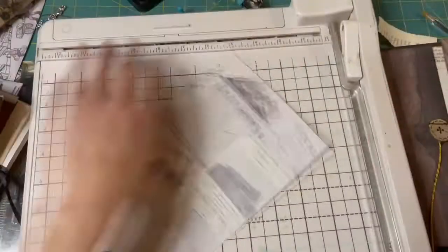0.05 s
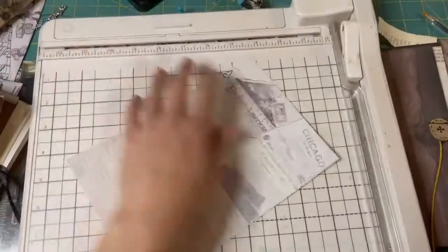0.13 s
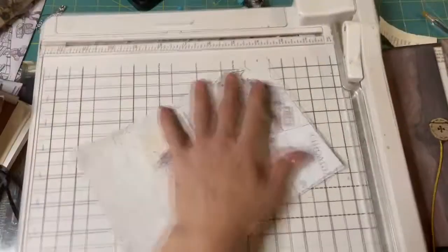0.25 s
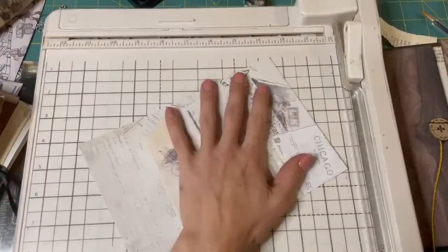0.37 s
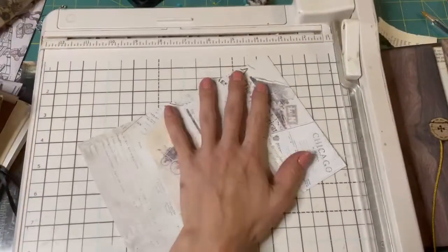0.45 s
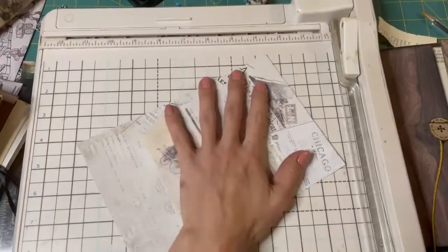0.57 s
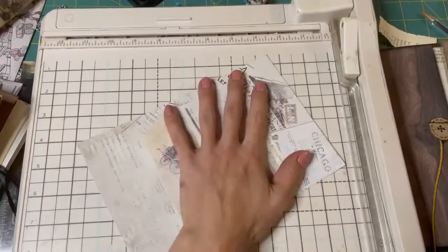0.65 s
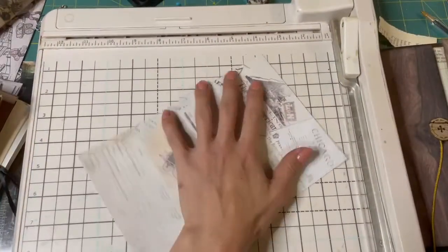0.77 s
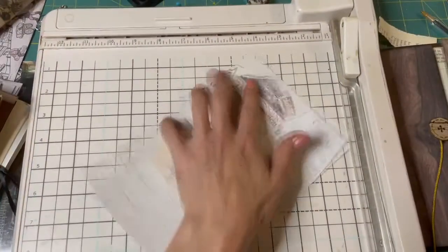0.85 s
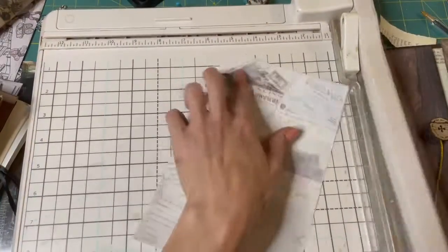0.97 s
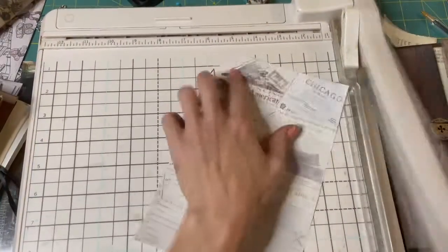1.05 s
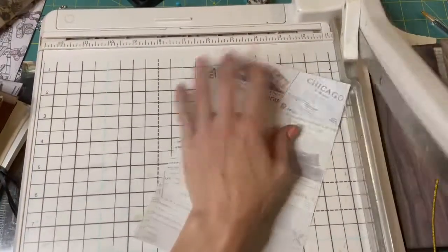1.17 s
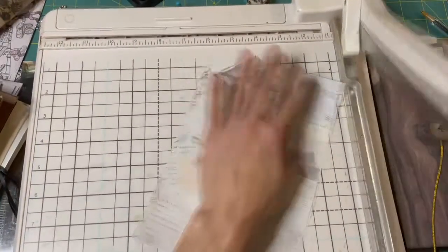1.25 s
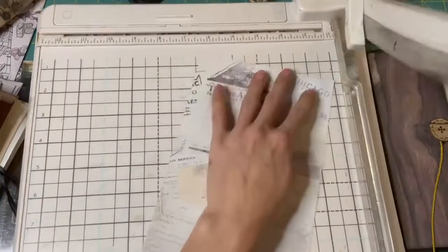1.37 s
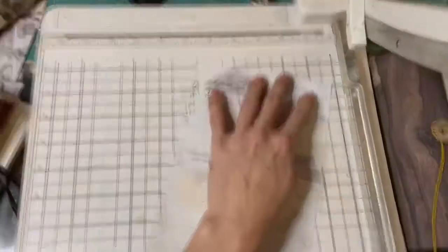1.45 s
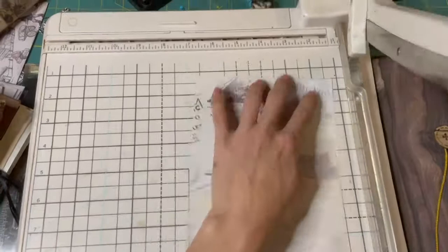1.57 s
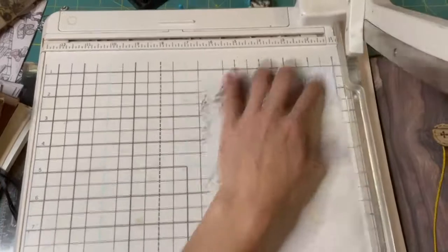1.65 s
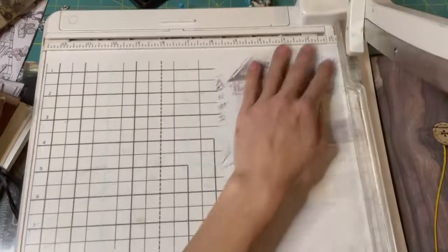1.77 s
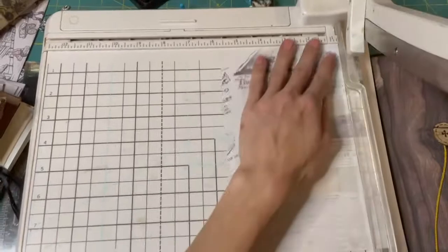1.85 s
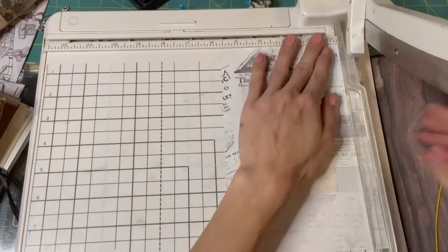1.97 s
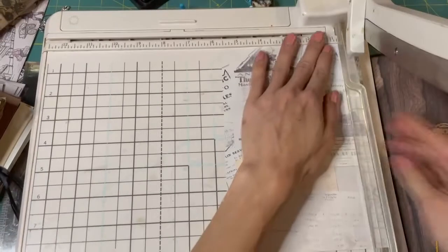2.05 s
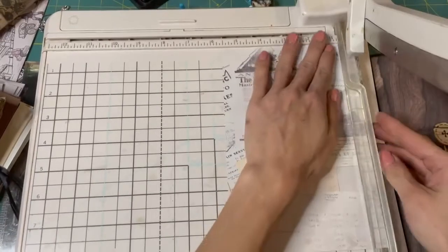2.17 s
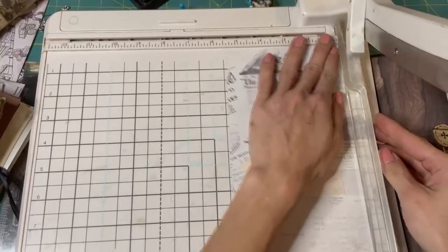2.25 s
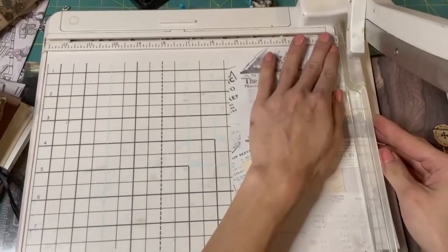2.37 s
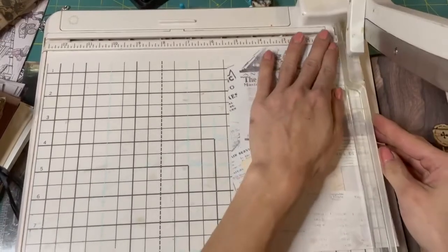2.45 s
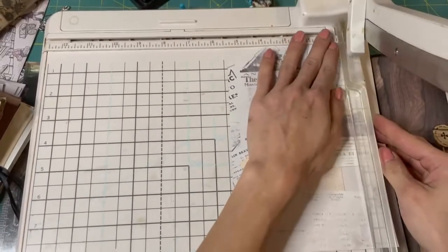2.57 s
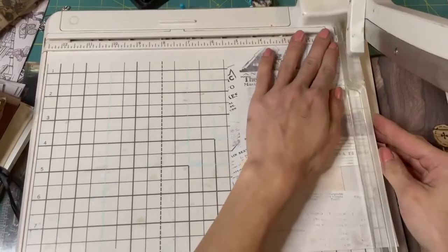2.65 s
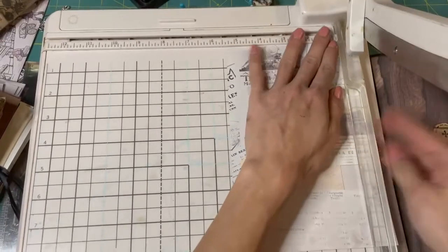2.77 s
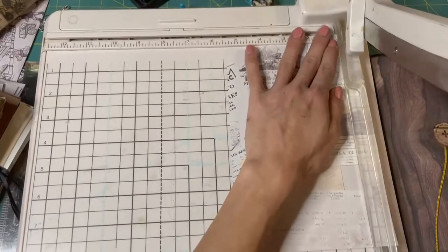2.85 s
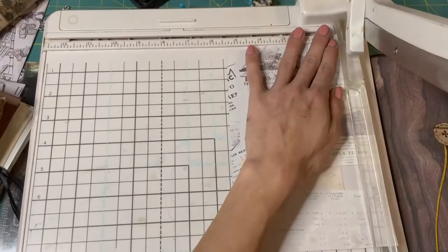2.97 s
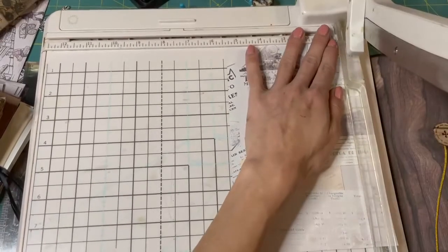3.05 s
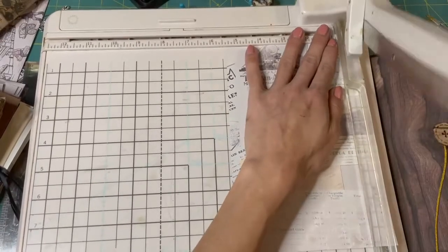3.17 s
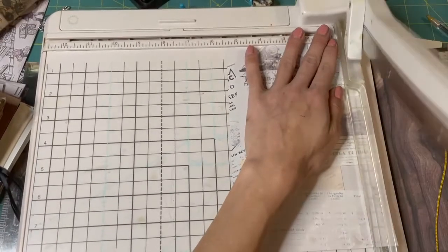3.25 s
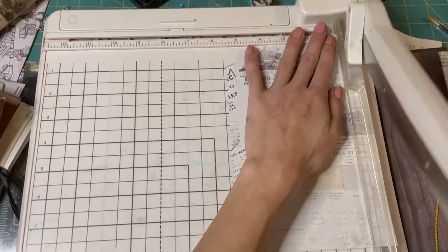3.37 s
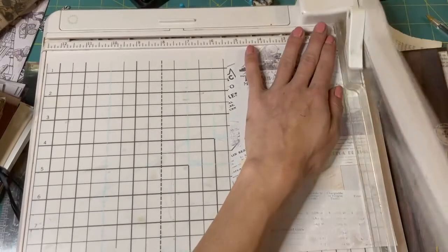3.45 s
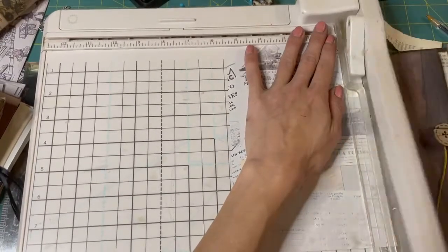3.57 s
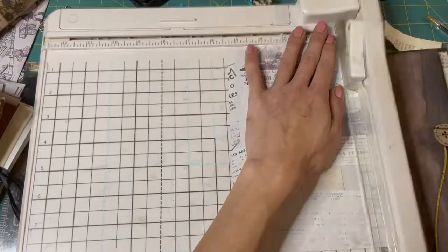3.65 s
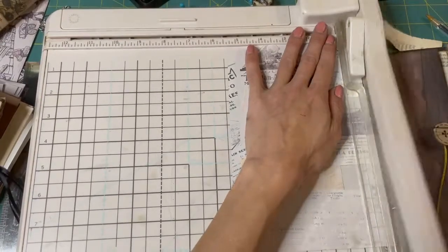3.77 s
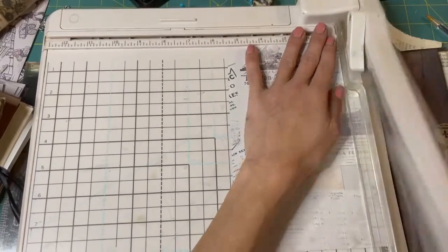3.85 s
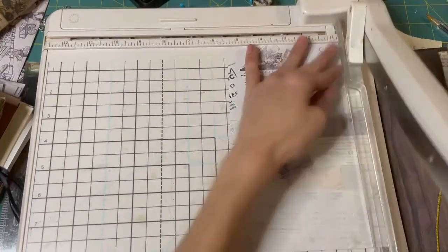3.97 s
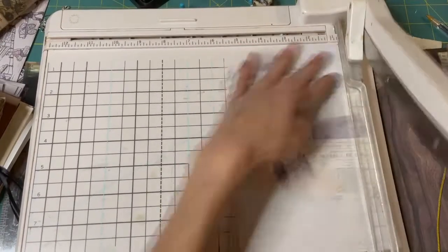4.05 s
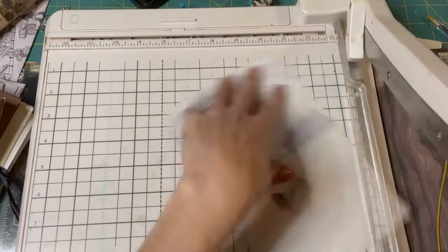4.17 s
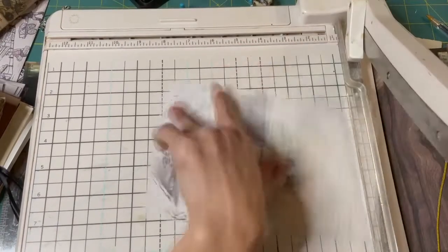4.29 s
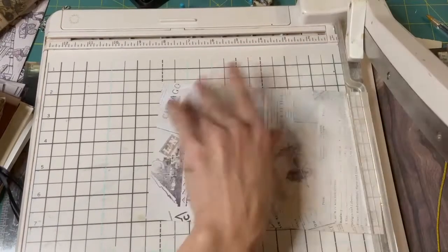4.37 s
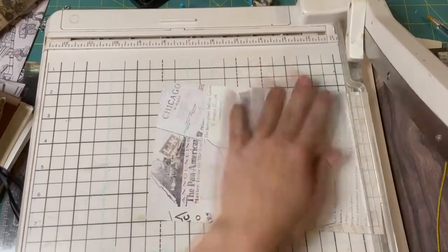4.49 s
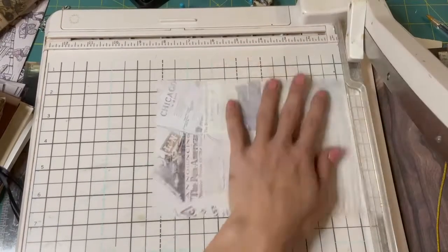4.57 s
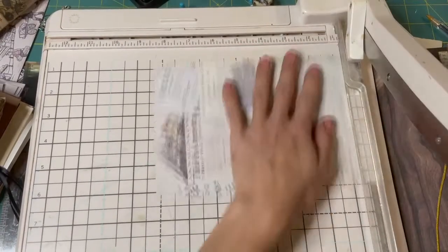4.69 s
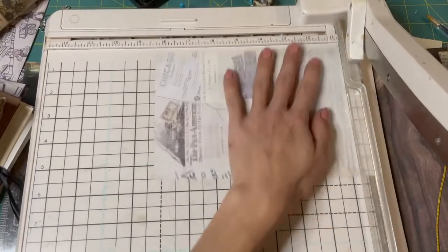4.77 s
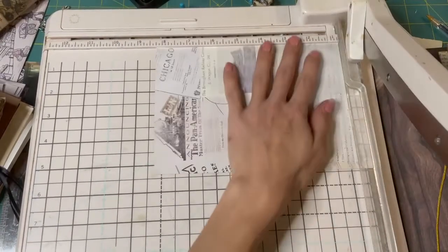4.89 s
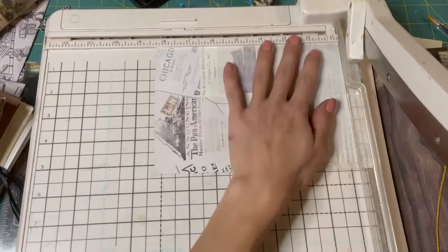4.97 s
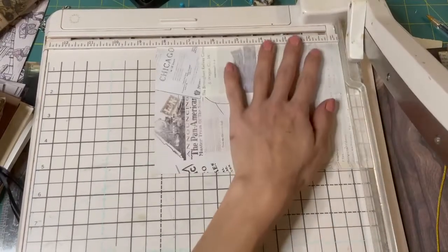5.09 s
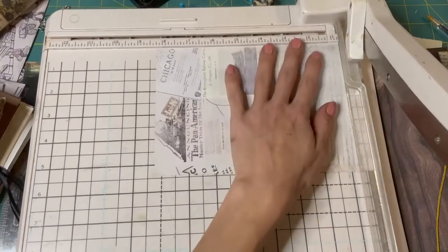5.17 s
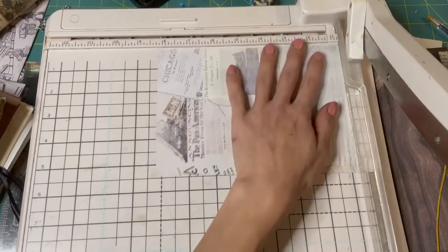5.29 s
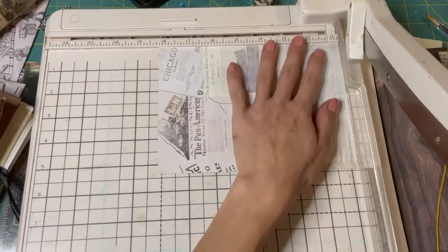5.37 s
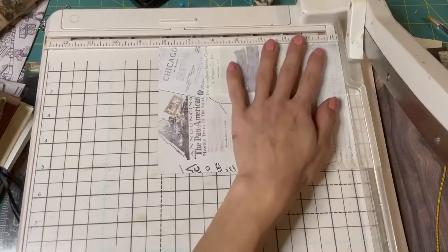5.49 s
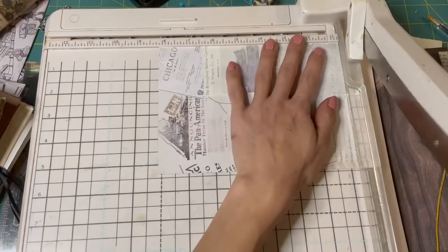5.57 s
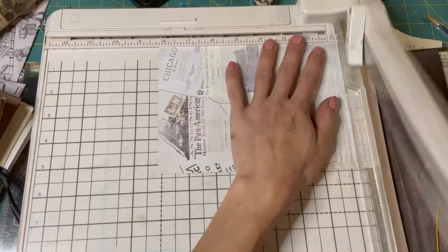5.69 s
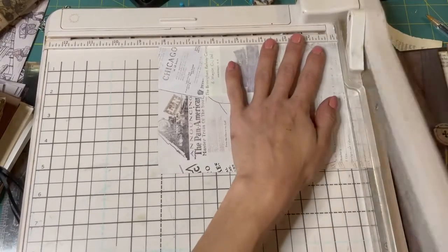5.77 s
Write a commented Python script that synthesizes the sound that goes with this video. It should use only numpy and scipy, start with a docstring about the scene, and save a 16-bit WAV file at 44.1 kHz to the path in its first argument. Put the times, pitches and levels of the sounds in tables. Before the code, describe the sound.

A paper trimmer on a craft table, recorded closely and dry with short room echoes. Soft sliding and dull knocks come first, then a rough arm rub and a brief wavering squeak. Quiet handling follows, then loose metallic clicks, a rapidly growing shear and a loud deep bang. Another rub and fainter squeaks precede brighter paper rustling, a calm gap, and a final cut cut short.

```python
"""First a hand slides a sheet over a board with a soft hiss and rub; this is a lever paper trimmer, close up.
The arm rises with a rub and a squeak, shears the paper and slams; it squeaks up again, then a second cut begins.
Friction and cutting are showers of tiny random clicks, shaped by filters; squeaks are unsteady sine tones.
Knocks are rattles with ringing sines, and thuds are short pushes that leave the table swinging.
Quiet air, a low rumble and the echoes of a small room lie around it all."""
import sys
import numpy as np
from scipy import signal
from scipy.fft import rfft, irfft
from scipy.io import wavfile
from scipy.ndimage import uniform_filter1d

SR = 44100
rng = np.random.default_rng(int(sys.argv[2]) if len(sys.argv) > 2 else 0)


def to_wav(sig):
    """Store sig (one row per channel, or 1-D mono) as 16-bit WAV at the path in sys.argv[1].

    Samples outside -1..1 are clipped; the rate is SR.
    """
    pcm = np.clip(np.atleast_2d(sig), -1, 1) * 32767
    pcm = np.round(pcm).astype(np.int16)
    wavfile.write(sys.argv[1], SR, pcm.T)  # frames by channels


N = 257103
TIME = np.arange(N) / SR  # seconds

# Every SPECTRUM table is a tone colour with the columns: freq_hz, shape_db
# Room air; low rumble of the table
AIR_SPECTRUM = [(100, -4.5), (280, -12.5), (410, -13), (560, -21), (1000, -18.5), (2300, -25), (5000, -29),
                (9000, -35.5), (16000, -56)]
RUMBLE_SPECTRUM = [(8, -3.5), (17, 8), (30, -16), (60, -12.5), (80, -21), (115, -27), (180, -42),
                   (400, -67.5)]
# Table trembling under the hands: time_s, level_db
TREMBLING = [(0.0, -41.5), (3.95, -46), (5.41, -46), (5.83, -39.5)]
# How long the room's echoes last: freq_hz, t60_s (time to fall by 60 dB)
ROOM_DECAY = [(100, .3), (500, .33), (2000, .34), (6000, .26), (14000, .13)]
# Hollow board, heard in most contacts: freq_hz, width_hz, lift_db
BOARD_PEAKS = [(421, 97, 10), (670, 13, 8), (880, 29, 0.5), (1030, 61, -1.5), (1380, 6, 8), (1553, 29, 2),
               (1820, 15, -1), (1820, 130, -0.5), (2500, 170, -3)]
# Soft pushes on board and table: start_s, strength_db, length_s
THUDS = [(0.151, -28, 0.0068), (0.485, -21.5, 0.0073), (0.514, -22.5, 0.0038), (0.853, -23.5, 0.0068),
         (0.994, -23, 0.0082), (1.43, -17, 0.0056), (1.456, -26.5, 0.0031), (3.579, -14.5, 0.0086),
         (3.611, -3.5, 0.014), (3.673, -4.5, 0.0058)]
# The table's own swing: freq_hz, level_db, t60_s
TABLE_MODES = [(48, -14, .28), (59.5, 3, .36), (82, -5, .19), (108, 0, .18), (148, -10, .18)]
# Arm bearing down on the board: start_s, length_s, level_db
GROANS = [(3.151, .04, -45.5), (3.389, 0.11, -35.5), (5.667, 0.137, -40.5)]
GROAN_SPECTRUM = [(40, -19.5), (75, 0), (190, -7), (300, -4.5), (550, -33.5), (2000, -70.5)]
# Pushes of the sheet over the board: start_s, length_s, hiss_db, hand_rub_db
SLIDES = [(0.024, 0.15, -76, -60.5), (0.179, 0.13, -60, -50.5), (0.333, 0.083, -63, -48.5),
          (0.677, 0.15, -63.5, -61), (0.802, 0.14, -59, -52.5), (1.194, 0.314, -67.5, -57),
          (1.445, 0.57, -60, -62.5), (2.124, 0.1, -67, -68), (2.312, 0.048, -67.5, -71),
          (2.352, 0.15, -85, -64.5), (2.55, 0.17, -81, -61.5), (3.23, 0.14, -74.5, -56),
          (3.911, 0.38, -55, -60), (4.07, 0.17, -52, -68), (4.5, 0.32, -57.5, -64),
          (5.072, 0.087, -70, -71), (5.247, 0.11, -70.5, -70)]
PAPER_SPECTRUM = [(710, -33), (1200, -0.5), (1630, -23.5), (1890, 5), (2200, -5), (4910, -1.5), (6950, -4),
                  (13700, -14.5), (16000, -25)]
HAND_SPECTRUM = [(120, 5), (400, 4), (700, 0), (1800, 0), (3000, -4.5), (6000, -20), (12000, -36)]
# Fingertips landing on sheet and handle: start_s, level_db
TAPS = [(0.144, -51.5), (0.46, -42.5), (0.684, -49.5), (1.392, -47.5), (1.433, -46), (2.379, -61),
        (2.564, -56), (2.796, -64.5), (2.868, -65.5), (4.283, -49), (4.478, -66)]
# Paper edges flicking against the board: start_s, level_db, tilt_db_per_octave
SNAPS = [(.043, -55.5, 0.5), (0.352, -51.5, 9.5), (2.546, -59.5, -1.5), (3.949, -42, 1), (4.273, -50.5, -1),
         (4.835, -48.5, -1), (4.863, -56, -1), (5.352, -52.5, -2.5)]
# Loose pivot clicking as it takes up its play: start_s, level_db, ring_hz
CLICKS = [(3.058, -54.5, 3500), (3.08, -40, 1480), (3.119, -57.5, 5040), (3.158, -45, 3240),
          (3.187, -42, 1600), (3.244, -56, 5000), (3.316, -60, 3970), (3.369, -41, 1190),
          (3.389, -42, 4940), (3.678, -35, 1130), (5.522, -53.5, 1194), (5.599, -50, 3920),
          (5.661, -39.5, 1250)]
TICK_SPECTRUM = [(100, 0.5), (400, -1), (1500, 3.5), (3000, 1), (6000, -0.5), (10000, -14), (16000, -30)]
# Knocks and slams on the frame:
# start_s, strength_db, tilt_db_per_octave, t60_s, low_ring_db, bright_ring_db
BLOWS = [(0.4798, -26.5, 1.4, 0.065, -13, -31), (0.4996, -24.5, 2, 0.062, -8.5, -22),
         (1.243, -59, -10, 0.021, -10, 2), (3.608, -12.5, 2, 0.073, -13, -0.5),
         (3.6167, -15.5, -1.5, 0.12, -15.5, -16.5)]
BLOW_SPECTRUM = [(80, -21.5), (170, -5), (400, -5), (650, -8.5), (850, -10), (1500, -2.5), (2500, -9),
                 (6100, -16.5), (9000, -25.5), (16000, -39.5)]
# Two groups of ringing tones heard after knocks, a lower, longer set and a brighter set:
# freq_hz, level_db, t60_s
LOW_RING_TONES = [(400, -15, .15), (698, -10.5, 0.25), (1130, -29, .6), (1320, 0.5, 0.15),
                  (1370, -3.5, 0.019), (1860, -19.5, 0.088), (2400, -31, 1), (2910, -32, 0.34)]
BRIGHT_RING_TONES = [(473, -11, 0.033), (1470, -12.5, 0.095), (1800, -6.5, 0.028), (3013, -14, 0.16),
                     (3980, -17, 0.2), (5170, -5, 0.047), (5910, 6.5, 0.03), (6900, -7, 0.061),
                     (11450, -21.5, 0.14)]
# Stick-slip squeaks of the pivot: start_s, length_s, pitch_hz, level_db, full_grip_roughness (0 to 1)
SQUEAKS = [(1.138, 0.12, 827.6, -31, 0.23), (3.989, 0.082, 962, -37.5, 0.2), (4.045, 0.09, 863, -37.5, .12)]
# Overtones of a squeak: pitch_multiple, level_db
SQUEAK_PARTIALS = [(1, -3), (2, -1.5), (3, -15.5), (4, -18), (5, -27.5)]
# Faint chirps as the arm creeps: peak_s, level_db, pitch_hz, length_s
CHIRPS = [(2.132, -57.5, 1840, 0.018), (2.285, -65, 1730, 0.024), (3.915, -43, 1697, 0.032),
          (5.578, -48.5, 1783, 0.041)]
# Arm rubbing along the board's edge: start_s, rise_s, level_db, fall_s
RUBS = [(0.948, 0.039, -27.5, 0.064), (3.756, 0.042, -29.5, 0.06), (5.669, 0.095, -28, 0.033)]
RUB_SPECTRUM = [(110, -7.5), (250, -12), (390, -1.5), (560, -12.5), (740, -2), (950, -9), (2300, -14.5),
                (3200, -26), (5000, -30), (15000, -53)]
# Brief scrapes of the edges: peak_s, strength_db, rise_s, fall_s, ring_hz
SCRAPES = [(0.403, -37, 0.0074, 0.0055, 2570), (0.884, -27, 0.0072, 0.023, 2380),
           (1.102, -28, 0.0025, 0.0077, 1700), (1.209, -39, 0.05, 0.018, 1430),
           (1.247, -45.5, 0.0035, 0.012, 4630), (1.463, -35, 0.0032, 0.0079, 4900),
           (3.591, -24.5, 0.0045, 0.028, 4680), (3.71, -26, 0.0045, 0.024, 2700)]
SCRAPE_SPECTRUM = [(150, -7), (400, -10), (1000, -1.5), (2500, -4), (4500, -8.5), (7000, -17), (10000, -25),
                   (16000, -40)]
# Blade shearing paper: start_s, time_to_full_bite_s, length_s, crunch_db
CUTS = [(3.402, .118, 0.16, -21.5), (5.726, 0.072, 0.094, -21.5)]
CRUNCH_SPECTRUM = [(80, -18.5), (250, -15), (370, -6.5), (560, -14), (750, -4), (1150, -9.5), (1500, -6),
                   (3200, -13.5), (4400, -24.5), (9000, -39.5), (16000, -64.5)]
FIZZ_SPECTRUM = [(1500, -34.5), (3500, 4.5), (5500, 0.5), (8000, -6), (11000, -14.5), (16000, -25.5)]

AIR_DB = -68.5
GROAN_ATTACK_S, GROAN_RELEASE_S, GROAN_DB_PER_S = 0.0083, 0.018, -29
PUSH_ATTACK_S, PUSH_RELEASE_S, PUSH_DB_PER_S = 0.028, 0.016, -23  # a quick start, then slowing
TAP_HZ, TAP_TILT_DB, TAP_RING_DB = 970, -3.5, 7  # ring, tilt per octave, how far the ring stands out
SNAP_HZ, SNAP_RING_DB = 2490, 9
CLICK_TILT_DB, CLICK_RING_DB = -0.7, 6.5
SQUEAK_SKEW, SQUEAK_SWELL = 0.64, 1.86  # grip peaks early; how steeply loudness follows it
SLACK_SHARP, SLACK_ROUGH = 0.05, 0.5  # a slack grip raises pitch by this share and adds roughness
BITE_DB, CUT_RELEASE_S = -15.5, 0.012  # crunch starts this far down; fades once the blade is through
FIZZ_DB, FIZZ_DB_PER_S = -47, 109.5  # tearing grows as the blade gathers speed
EDGE_HZ = 15950  # upper limit of the treble


def amp(db):
    """Turns decibels into a gain."""
    return 10 ** (np.asarray(db) / 20)


def unit(x):
    """Scales to an average strength (rms) of 1."""
    return x / np.sqrt(np.mean(x ** 2) + 1e-20)


def read(points, hz):
    """Reads a table between its points, along a logarithmic frequency axis."""
    f, value = np.transpose(points)
    return np.interp(np.log(hz + 1), np.log(f + 1), value)


def add(mix, s, sound):
    """Mixes a sound in at time s."""
    part = mix[max(round(s * SR), 0):][:len(sound)]
    part += sound[:len(part)]


def stroke(start, length, attack_s, release_s, db_per_s):
    """Gain of one movement: attack, a hold that may grow or fade, release."""
    t = TIME - start
    attack = np.clip(t / attack_s, 0, 1)
    hold = amp(db_per_s * np.clip(t, 0, length))
    release = np.exp(-np.maximum(t - length, 0) / release_s)
    return attack * hold * release


def colour(x, spectrum, peaks=(), tilt=0, size=4096):
    """Filters with a broad spectrum plus resonances; it has energy 1 and never sounds ahead of its input."""
    hz = abs(np.fft.fftfreq(size, 1 / SR))
    db = read(spectrum, hz) + tilt * np.log2(np.maximum(hz, 300) / 2000)
    db = db + sum(lift / (1 + (2 * (hz - f) / width) ** 2) for f, width, lift in peaks)
    # minimum phase: the sound comes out as early as it can
    response = np.exp(np.conj(signal.hilbert(np.log(amp(db)))))
    taps = np.fft.ifft(response).real[:size // 2]
    return signal.oaconvolve(x, taps / np.linalg.norm(taps))[:len(x)]


def grains(per_s, spread_db):
    """Tiny slips and snaps at random moments; the spread sets how unequal their sizes are."""
    sizes = amp(spread_db * np.minimum(rng.exponential(1, N), 4)) * rng.choice([-1, 1], N)
    return unit(sizes * (rng.random(N) < per_s / SR))


def wander(rate_hz):
    """Smooth random drift of rms 1."""
    hz = np.fft.rfftfreq(N, 1 / SR)
    spectrum = rfft(rng.standard_normal(N)) * np.exp(-(hz / rate_hz) ** 2)
    return unit(irfft(spectrum, N))


def shifting(x, depth_db, width_hz, hold_s):
    """As a contact travels, narrow resonances swell and fade while the power stays steady."""
    hz, t, z = signal.stft(x, SR, nperseg=512, noverlap=384)
    field = rng.standard_normal(z.shape)
    offset = np.arange(-15, 16)
    # smooth the random field over frequency, then over time
    for axis, size in enumerate([width_hz / hz[1], hold_s / t[1]]):
        kernel = np.exp(-(2 * offset / size) ** 2)
        field = signal.fftconvolve(field, np.expand_dims(kernel, 1 - axis), "same")
    z = z * amp(depth_db * unit(field))
    power = uniform_filter1d((abs(z) ** 2).mean(0), size=5)
    z = z / np.sqrt(power + 1e-20)
    return unit(signal.istft(z, SR, nperseg=512, noverlap=384)[1][:N])


def ring(modes):
    """Dying sines that follow a knock or push, one second long."""
    t = TIME[:SR]
    return sum(amp(db - 60 * t / t60) * np.sin(2 * np.pi * hz * t) for hz, db, t60 in modes)


def burst(t60, rise, size=12000):
    """A contact's rattle: random signs that rise quickly and die away."""
    t = TIME[:size]
    decay = np.exp(-np.log(1000) * t / max(t60, .004))
    return rng.choice([-1., 1.], size) * decay * (1 - np.exp(-t / rise))


def background():
    """Quiet room air with one hollow resonance, and the trembling table."""
    air = amp(AIR_DB) * colour(rng.standard_normal(N), AIR_SPECTRUM, [(410, 22, 13)])
    rumble = unit(colour(rng.standard_normal(N), RUMBLE_SPECTRUM, size=32768))
    return air + rumble * amp(np.interp(TIME, *np.transpose(TREMBLING)))


def room(x):
    """Sparse reflections off the table and near walls, the highest treble dying first."""
    length = SR // 2
    present = (rng.random(length) < 4000 / SR) * (TIME[:length] > .004)
    echoes = rng.standard_normal(length) * present
    hz, t, z = signal.stft(echoes, SR, nperseg=256)
    decay = np.exp(-np.log(1000) * t / read(ROOM_DECAY, hz)[:, None])
    tail = signal.istft(z * decay, SR, nperseg=256)[1]
    return signal.fftconvolve(x, tail / np.linalg.norm(tail))[:N]


def thuds():
    """Each push dents the board, which springs back and leaves the table swinging."""
    out, table = np.zeros(N), ring(TABLE_MODES)
    for s, db, length in THUDS:
        push = signal.windows.hann(max(int(length * SR), 8))
        swing = signal.fftconvolve(push / push.sum(), table)
        add(out, s, -amp(db) * .8 * push)
        add(out, s, -amp(db) * 0.49 * swing)
    return signal.sosfilt(signal.butter(2, 48, "high", fs=SR, output="sos"), out)


def groans():
    """The board shudders low when the arm bears down on it."""
    shudder = colour(grains(per_s=900, spread_db=-2.5), GROAN_SPECTRUM)
    gain = sum(amp(db) * stroke(start, length, GROAN_ATTACK_S, GROAN_RELEASE_S, GROAN_DB_PER_S)
               for start, length, db in GROANS)
    return shudder * gain


def sliding():
    """Paper hisses over the board; the hand on top adds a duller, grainier rub."""
    hiss = colour(grains(per_s=11000, spread_db=2.3), PAPER_SPECTRUM)
    rub = colour(grains(per_s=2500, spread_db=3), HAND_SPECTRUM, BOARD_PEAKS)
    pressure = amp(1.2 * wander(rate_hz=35))
    out = np.zeros(N)
    for start, length, hiss_db, rub_db in SLIDES:
        push = stroke(start, length, PUSH_ATTACK_S, PUSH_RELEASE_S, PUSH_DB_PER_S)
        out += (amp(hiss_db) * hiss + amp(rub_db) * rub) * push
    return pressure * out


def tick(db, hz, tilt, ring_db):
    """A light contact: a click, a short rattle and a broad ring."""
    contact = burst(t60=.055, rise=.0005) + 1.6 * burst(t60=.017, rise=.0004)
    sound = colour(contact, TICK_SPECTRUM, BOARD_PEAKS + [(hz, 0.78 * hz, ring_db)], tilt)
    return amp(db) * sound / sound[:SR // 100].std()  # level set over the first 10 ms


def ticks():
    """Dull fingertips, crisp paper edges, and the clicks of the arm's loose pivot."""
    out = np.zeros(N)
    for s, db in TAPS:
        add(out, s, tick(db, TAP_HZ, TAP_TILT_DB, TAP_RING_DB))
    for s, db, tilt in SNAPS:
        add(out, s, tick(db, SNAP_HZ, tilt, SNAP_RING_DB))
    for s, db, hz in CLICKS:
        add(out, s, tick(db, hz, CLICK_TILT_DB, CLICK_RING_DB))
    return out


def blows():
    """A sharp crack and a short rattle, followed by a lower, longer ring and a brighter one."""
    out, low_ring, bright_ring = np.zeros(N), ring(LOW_RING_TONES), ring(BRIGHT_RING_TONES)
    for s, db, tilt, t60, low_db, bright_db in BLOWS:
        contact = burst(t60, rise=.0012) + 2.1 * burst(t60=.015, rise=.0008)
        ringing = amp(low_db) * low_ring + amp(bright_db) * bright_ring
        add(out, s, amp(db + 4.0) * colour(contact, BLOW_SPECTRUM, BOARD_PEAKS, tilt))
        add(out, s + 0.0023, amp(db) * ringing)
    return out


def squeaks():
    """The pivot sticks and slips: its grip tightens and slackens, and a slack grip staggers and adds grit."""
    out = np.zeros(N)
    grit = colour(rng.standard_normal(N), SCRAPE_SPECTRUM, BOARD_PEAKS)
    for start, length, hz, level_db, least_rough in SQUEAKS:
        progress = np.clip((TIME - start) / length, 0, 1)
        grip = abs(np.sin(np.pi * progress ** SQUEAK_SKEW))
        rough = least_rough + SLACK_ROUGH * (1 - grip)
        pitch = hz * (1 + SLACK_SHARP * (1 - grip)) * (1 + .11 * rough * wander(rate_hz=350))
        turn = 2 * np.pi * np.cumsum(pitch) / SR
        tone = sum(amp(db) * np.sin(multiple * turn) * (1 + rough * wander(rate_hz=250))
                   for multiple, db in SQUEAK_PARTIALS)
        tone = tone / tone[grip > .5].std()
        out += (tone + .5 * rough * grit) * amp(level_db) * grip ** SQUEAK_SWELL
    stagger = np.cumsum(1 + .03 * wander(rate_hz=177)) / SR  # time running unevenly
    for s, db, hz, length in CHIRPS:
        swell = np.exp(-(2 * (TIME - s) / length) ** 2)
        out += amp(db) * swell * np.sin(2 * np.pi * hz * stagger)
    return out


def arm_friction():
    """The arm judders along the board's edge and its steel scrapes in short bites."""
    judder = colour(grains(per_s=1100, spread_db=1.8), RUB_SPECTRUM, BOARD_PEAKS)
    judder = shifting(judder, depth_db=3.8, width_hz=95, hold_s=.035)
    out = judder * sum(amp(db) * stroke(start, rise, rise, fall, 0) for start, rise, db, fall in RUBS)
    slips = shifting(grains(per_s=5000, spread_db=2.5), depth_db=5.5, width_hz=170, hold_s=0.011)
    for s, db, rise, fall, hz in SCRAPES:
        bite = np.exp(-np.maximum((s - TIME) / rise, (TIME - s) / fall))
        out += amp(db) * colour(slips * bite, SCRAPE_SPECTRUM, BOARD_PEAKS + [(hz, .25 * hz, 8)])
    return out


def cutting():
    """Fibres snap between the blades: a crunch through the board and a fizz straight from the paper."""
    crunch = colour(grains(per_s=4500, spread_db=1.2), CRUNCH_SPECTRUM, BOARD_PEAKS)
    crunch = shifting(crunch, depth_db=3.4, width_hz=120, hold_s=.022)
    fizz = colour(grains(per_s=4000, spread_db=2.1), FIZZ_SPECTRUM)
    fizz = shifting(fizz, depth_db=3.2, width_hz=300, hold_s=.016)
    chatter = amp(1.1 * wander(rate_hz=170))
    out = np.zeros(N)
    for start, bite_s, length, db in CUTS:
        shallow = np.clip(1 - (TIME - start) / bite_s, 0, 1)  # 1 at first touch, 0 at full bite
        out += crunch * amp(db + BITE_DB * shallow) * stroke(start, length, 0.006, CUT_RELEASE_S, 0)
        out += fizz * amp(FIZZ_DB) * stroke(start, length, .003, CUT_RELEASE_S, FIZZ_DB_PER_S)
    return out * chatter


def scene():
    """Adds room echoes to the near sounds, then thuds, groans and background without them."""
    near = cutting() + arm_friction() + squeaks() + sliding() + ticks() + blows()
    return (near + amp(-20) * room(near) + thuds() + groans() + background())[None]


def record(dry):
    """Flattens any peak beyond full scale, then cuts the treble above the limit."""
    clipped = np.clip(dry, -1, 1)
    low_pass = signal.firwin(401, EDGE_HZ, window=("kaiser", 7), fs=SR)
    return signal.oaconvolve(clipped, low_pass[None], "same")


dry = scene()
out = record(dry)
to_wav(out)
```